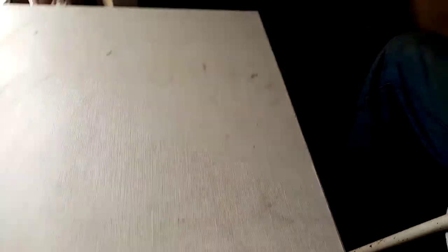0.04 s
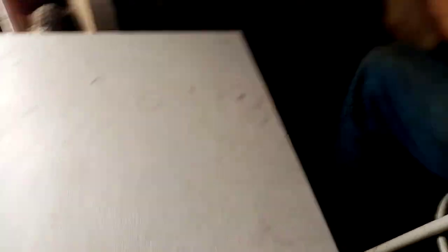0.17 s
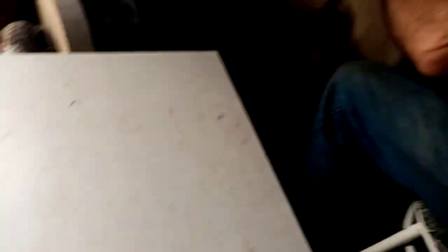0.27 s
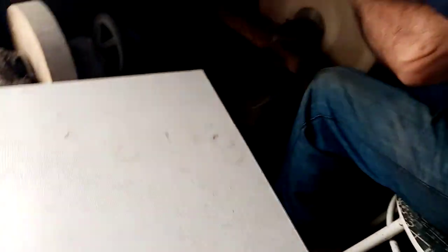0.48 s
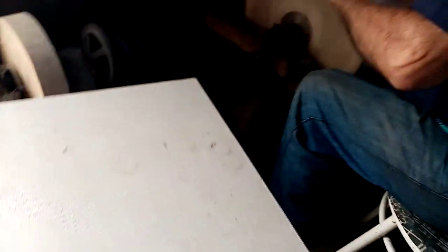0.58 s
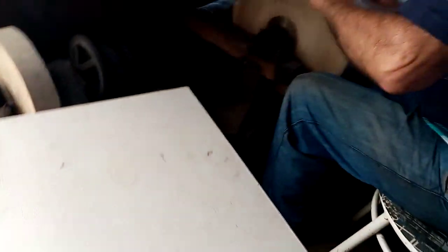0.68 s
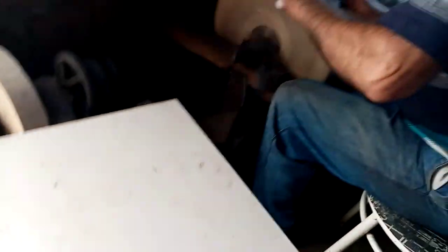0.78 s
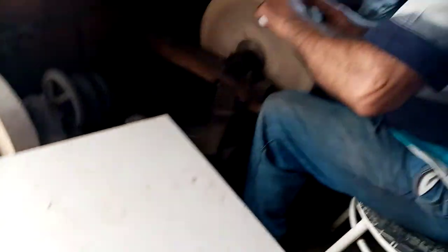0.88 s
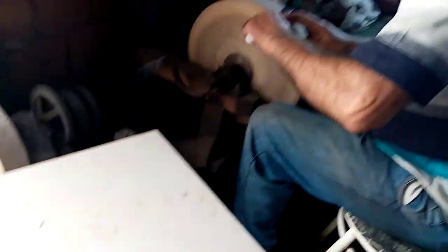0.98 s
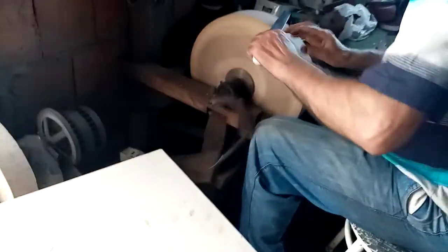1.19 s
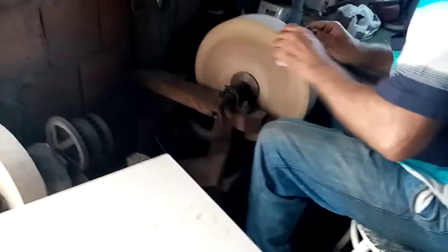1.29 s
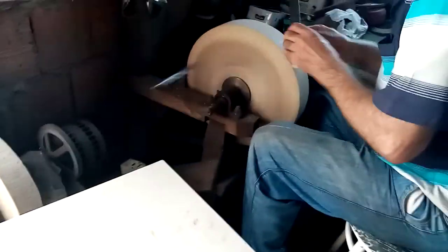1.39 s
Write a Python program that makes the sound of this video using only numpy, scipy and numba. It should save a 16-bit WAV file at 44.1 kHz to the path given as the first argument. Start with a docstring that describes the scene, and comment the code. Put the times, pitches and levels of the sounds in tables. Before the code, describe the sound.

A steel blade grinds against a spinning wheel, close by in a small workshop. The bright, gritty rasp starts just after the beginning and swells until about 0.6 seconds, its tone climbing, with brief high metallic squeals between 0.5 and 1.1 seconds. It stops abruptly at about 1.1 seconds. A light brush follows at 1.2 seconds and a fainter one at 1.4, over a quiet low rumble.

```python
"""A steel blade drawn across a spinning grinding wheel, close to a hand-held stereo microphone in a
small workshop. Grit strikes the edge in dense, chattering clicks that ring the steel; its resonances
climb as the contact slides along, and now and then the edge bites and sings. The blade lifts off and
brushes the stone twice more. Bench and walls give short echoes, and a quiet rumble lies underneath."""
import sys
import numpy as np
from scipy import signal
from scipy.fft import rfft, irfft
from scipy.io import wavfile
from scipy.ndimage import map_coordinates
from numba import njit

SR = 44100
rng = np.random.default_rng(int(sys.argv[2]) if len(sys.argv) > 2 else 0)


def unload_wav(signal):
    """Save mono or channel-first audio to the path in sys.argv[1] as 16-bit WAV at rate SR, clipped to [-1, 1]."""
    wavfile.write(
        sys.argv[1],
        SR,
        np.round(np.clip(np.atleast_2d(signal).T, -1, 1) * 32767).astype(np.int16),
    )


N = 63945


def grinding(force):
    """Blade on the wheel, heard close: one stream of grit drives the rasp and the resonances."""
    strikes = grit(force)
    return rasp(strikes) + blade(strikes) + sliding_bends(strikes) + wheel(strikes) + hiss(strikes)


# Force of the blade on the stone. Each row: time in seconds, level in dB.
STROKE_FORCE = [(.06, -53), (.09, -42), (.135, -45.5), (.203, -46.5), (.225, -40.5), (.26, -41.5),
                (.35, -36.5), (.5, -30.5), (.59, -28), (.65, -26.5), (.72, -29), (.82, -28.5), (.95, -30),
                (1.03, -27), (1.12, -27.5)]
# Light touches after the lift. Each row: start and length in seconds, level in dB, fade in dB a second.
LIGHT_BRUSHES = [(1.202, 0.067, -50, 113), (1.378, 0.046, -69, -9)]
TOUCH_S, LIFT_S, LIFT_DB_PER_S = .0602, 1.126, 748


def contact_force():
    """The hand presses the blade on for one long stroke, lifts it and brushes the stone again."""
    t = clock()
    force = (t >= TOUCH_S) * fader(STROKE_FORCE) * undb(-LIFT_DB_PER_S * np.maximum(t - LIFT_S, 0))
    for start, length, db, fade in LIGHT_BRUSHES:
        age = np.maximum(t - start, 0)
        release_db = LIFT_DB_PER_S * np.maximum(age - length, 0)
        force += (t >= start) * undb(db - fade * age - release_db)
    return force


# Coarse grains catch the edge. Each row: start in seconds, peak in dB over the stream of grit.
COARSE_GRAINS = [(.0607, 9), (.179, 8), (.2868, 7), (.3267, 7), (.3566, 6), (.5243, 7), (.6922, 12),
                 (.7210, 8), (1.0835, 9), (1.424, 13)]
GRITS_PER_S, GRIT_SPREAD_DB, DUST_DB = 8000, 2, -3.5
CHATTER_HZ, CHATTER_DB, WOBBLE_HZ, WOBBLE_DB = 511.5, 1, 70.63, 0.59


def grit(force):
    """Grains strike in uneven clicks over fine dust, bunched by the chatter of the edge."""
    hits = (rng.random(N) < GRITS_PER_S / SR) * rng.choice([-1, 1], N)
    sizes = undb(GRIT_SPREAD_DB * np.minimum(rng.exponential(size=N), 5))
    dust = undb(DUST_DB) * rng.standard_normal(N)
    chatter = undb(CHATTER_DB * wander(CHATTER_HZ) + WOBBLE_DB * wander(WOBBLE_HZ))
    stream = unit((unit(hits * sizes) + dust) * chatter)
    catches = sum(undb(db) * burst(start, decay_s=.002) for start, db in COARSE_GRAINS)
    return force * (stream + catches * rng.standard_normal(N))


# Tone of the rasp, right at the contact. Each row: frequency in Hz, relative level in dB.
RASP_SPECTRUM = [(150, -65), (400, -53.5), (700, -24), (1000, -44.5), (1400, -16.5), (2000, -24.5),
                 (2500, -6), (3100, -7.5), (4200, -4), (5500, -2), (6300, 3), (7100, 0.5), (8000, -1),
                 (9800, -15), (11000, -12.5), (13500, -13), (14800, -4), (16000, -3)]


def rasp(strikes, gain_db=5.02):
    """Grit scrapes the steel with a broad, bright noise."""
    return undb(gain_db) * colour(strikes, RASP_SPECTRUM)


# Modes of the blade. Each row: frequency in Hz, width in Hz, relative level in dB.
BLADE_MODES = [(4870, 98, -20.5), (4880, 250, -13.5), (5626, 200, 6.5), (6320, 160, 3), (6870, 100, 4.5),
               (6538, 240, 10.5), (7100, 230, 4.5), (7660, 530, 8.5), (8070, 220, -22), (8410, 380, -16.5),
               (9850, 570, -5.5), (11820, 350, -5), (14950, 700, -12)]
# Strength of their ringing. Each row: time in seconds, gain in dB.
BLADE_RING_LEVEL = [(.06, 0.5), (.3, 1), (.5, -14), (.7, -27), (.9, -1.5), (1.1, -8.5), (1.22, -17.5)]


def blade(strikes):
    """The struck steel rings, more or less strongly as grip and contact change."""
    return fader(BLADE_RING_LEVEL) * modes(strikes, BLADE_MODES)


# Bending resonances of the blade. Each row: time in seconds, then frequency in Hz and gain in dB
# for the low, the middle and the upper one.
BEND_TRACKS = [(.06, 520, -31.5, 944, -19, 2320, -13), (.3, 480, -26.5, 1008, -15.5, 2450, -8),
               (.48, 596, -28, 1040, -22.5, 2720, -12), (.6, 686, -30, 1240, -23, 3000, -57),
               (0.739, 700, -39.5, 1350, -13.5, 3780, -8), (.88, 690, -30, 1457, -17, 4860, -35),
               (0.967, 680, -31, 1620, -10.5, 4750, -7), (1.01, 654, -32.5, 1920, -19.5, 4780, -22),
               (1.12, 690, -41.5, 2060, -25.5, 4700, -22)]


def sliding_bends(strikes, widths_hz=(240, 340, 800)):
    """Three bending resonances climb as the contact slides along the blade."""
    t = clock()
    times, *columns = np.array(BEND_TRACKS).T
    return sum(undb(np.interp(t, times, db)) * ring(strikes, np.interp(t, times, hz), width)
               for hz, db, width in zip(columns[::2], columns[1::2], widths_hz))


# Brightness at the contact. Each row: time in seconds, gain of the hiss in dB.
HISS_LEVEL = [(.06, -6.5), (.3, -6.5), (.55, -9.5), (.7, -4.5), (.85, -2.5), (1.1, -3), (1.25, -15.5),
              (1.44, -2.5)]


def hiss(strikes):
    """The same strikes, with random signs, fill the top octave of the rasp."""
    return fader(HISS_LEVEL) * ring(strikes * rng.choice([-1, 1], N), hz=9160, width_hz=3520)


# The edge bites. Each row: start and length in seconds, pitch in Hz, level in dB relative to the grit.
EDGE_BITES = [(.525, .09, 6600, -2), (.56, .115, 4780, -8), (.665, .085, 3300, -17), (.688, .11, 6430, 3),
              (.75, .065, 3870, -15), (1.05, .085, 5720, -5)]


def singing(force):
    """Friction briefly feeds one blade mode at each bite."""
    tones = 0
    for start, length, hz, db in EDGE_BITES:
        progress = np.clip((clock() - start) / length, 0, 1)
        swell = np.sqrt(np.abs(np.sin(np.pi * progress)))
        tones += undb(db) * swell * ring(rng.standard_normal(N), hz, width_hz=200)
    return force * tones


# Low modes of wheel and tool rest. Each row: frequency in Hz, width in Hz, relative level in dB.
WHEEL_MODES = [(1200, 30, 8), (1588, 53, 4)]
WHEEL_DB, WHEEL_UNTIL_S, WHEEL_FADE_DB_PER_S = -27, 0.83, 128.5


def wheel(strikes):
    """Wheel and rest ring faintly under the grit and fade late in the stroke."""
    fade_db = WHEEL_FADE_DB_PER_S * np.maximum(clock() - WHEEL_UNTIL_S, 0)
    return undb(WHEEL_DB - fade_db) * modes(strikes, WHEEL_MODES)


EARLY_DB, EARLY_T60_S, WALLS_DB, WALLS_T60_S, WALLS_CUTOFF_HZ = 1.5, 0.042, -8, 0.18, 9000


def reflections(x, patterns=14):
    """Quick echoes off bench and wheel, then the duller walls; they shift as hand and microphone move."""
    t, echoes = clock()[:SR // 3], 0
    dull = signal.butter(1, WALLS_CUTOFF_HZ, fs=SR, output="sos")
    position = np.linspace(0, patterns - 1, N)
    for k in range(patterns):
        early = rng.standard_normal(len(t)) * (t > .0005) * undb(-60 * t / EARLY_T60_S)
        late = rng.standard_normal(len(t)) * (t > .008) * undb(-60 * t / WALLS_T60_S)
        response = undb(EARLY_DB) * unit(early) + undb(WALLS_DB) * unit(signal.sosfilt(dull, late))
        crossfade = np.sqrt(np.maximum(1 - np.abs(position - k), 0))
        echoes += signal.fftconvolve(x * crossfade, response)[:N]
    return echoes / np.sqrt(len(t))


# Room tone of the workshop. Each row: frequency in Hz, relative level in dB.
ROOM_TONE = [(20, -11.5), (35, -3.5), (55, -1), (170, -2), (300, -7.5), (700, -10), (2000, -11),
             (4000, -18), (7000, -11.5), (11000, -29.5), (15000, -14)]
# Soft low bumps in the background. Each row: start in seconds, frequency in Hz, gain in dB.
LOW_BUMPS = [(.52, 75, -73), (.912, 160, -76), (.98, 165, -67), (1.29, 200, -73)]


def workshop(tone_db=-67.5):
    """A quiet rumble, different on each side of the microphone, and a few bumps common to both."""
    bumps = sum(undb(db) * ring(burst(start, decay_s=.022) * rng.standard_normal(N), hz, hz / 2)
                for start, hz, db in LOW_BUMPS)
    return [undb(tone_db) * unit(colour(rng.standard_normal(N), ROOM_TONE)) + bumps for _ in range(2)]


# Shading of the microphone's left port. Each row: frequency in Hz, gain in dB.
LEFT_SHADE = [(200, -3.5), (900, -6), (2500, -4.5), (5300, -5.5), (6400, -8), (7200, -12.5), (7900, -6),
              (8900, -11.5), (10000, -11.5), (12000, -18), (15000, -26)]
# The grinder on the left as the microphone turns in the hand. Each row: time in seconds, gain in dB.
MICROPHONE_TURN = [(.06, 4.5), (.3, 2), (.5, 3.5), (.73, 0), (.92, 2.5), (1.1, 3), (1.3, -1)]
LEAD_MS, LEAD_MS_PER_S = 1.196, -0.2


def left_port(steel, background):
    """The left port hears the wheel a little sooner than the right, but is shaded and duller."""
    t = clock()
    lead_s = (LEAD_MS + LEAD_MS_PER_S * t) / 1000
    sooner = map_coordinates(steel, [(t + lead_s) * SR], order=3)
    return colour(fader(MICROPHONE_TURN) * (sooner + reflections(sooner)) + background, LEFT_SHADE)


def undb(db):
    """Decibels to gain."""
    return 10 ** (np.asarray(db) / 20)


def unit(x):
    """Scale to rms 1."""
    return x / np.sqrt(np.mean(x ** 2) + 1e-18)


def clock():
    """Time of every sample in seconds."""
    return np.arange(N) / SR


def fader(points):
    """Gain along (seconds, dB) points."""
    return undb(np.interp(clock(), *np.array(points).T))


def wander(hz):
    """Random drift of rms 1, with hz new values a second."""
    return unit(np.interp(clock() * hz, np.arange(N), rng.standard_normal(N)))


def burst(start, decay_s):
    """Sudden onset, exponential fade."""
    age = clock() - start
    return (age >= 0) * np.exp(-np.abs(age) / decay_s)


def colour(x, points, size=8192):
    """Minimum-phase filter through (Hz, dB) points."""
    hz, db = np.array(points).T
    bins_hz = np.maximum(np.fft.rfftfreq(size, 1 / SR), 1)
    gain = undb(np.interp(np.log(bins_hz), np.log(hz), db))
    cepstrum = irfft(np.log(gain))
    cepstrum[1:size // 2] *= 2  # folding onto positive time makes the filter causal
    cepstrum[size // 2 + 1:] = 0
    return signal.fftconvolve(x, irfft(np.exp(rfft(cepstrum))))[:N]


@njit
def bandpass(x, hz, width_hz):
    """State-variable band-pass with a moving centre."""
    y, band_state, low_state = np.empty(len(x)), 0., 0.
    for i in range(len(x)):
        step, damping = np.tan(np.pi * hz[i] / SR), width_hz / hz[i]
        band = (band_state + step * (x[i] - low_state)) / (1 + step * (step + damping))
        band_state = 2 * band - band_state
        low_state += 2 * step * band
        y[i] = damping * band
    return y


def ring(x, hz, width_hz):
    """A steep-sided resonance that keeps the power of white noise."""
    hz, width_hz = hz * np.ones(N), float(width_hz)
    return bandpass(bandpass(x, hz, width_hz), hz, width_hz) * np.sqrt(2 * SR / (np.pi * width_hz))


def modes(x, table):
    """Ring (Hz, width in Hz, dB) modes, their powers scaled to sum to 1."""
    total_power = sum(undb(db) ** 2 for _, _, db in table)
    return sum(undb(db) * ring(x, hz, width) for hz, width, db in table) / np.sqrt(total_power)


def scene(gain_db=-2):
    """Grinder close by and workshop behind it, at the two ports of the hand-held microphone."""
    force = contact_force()
    steel = grinding(force) + singing(force)
    room_left, room_right = workshop()
    left = left_port(steel, room_left)
    right = steel + reflections(steel) + room_right
    return undb(gain_db) * np.array([left, right])


def record(dry, top_hz=15650):
    """The recorder cuts the highest treble steeply."""
    return signal.sosfilt(signal.ellip(12, .2, 80, top_hz, fs=SR, output="sos"), dry)


dry = scene()
out = record(dry)
unload_wav(out)
```